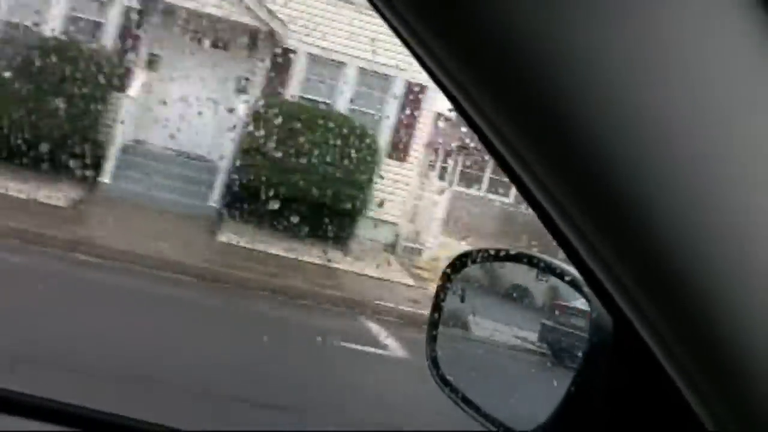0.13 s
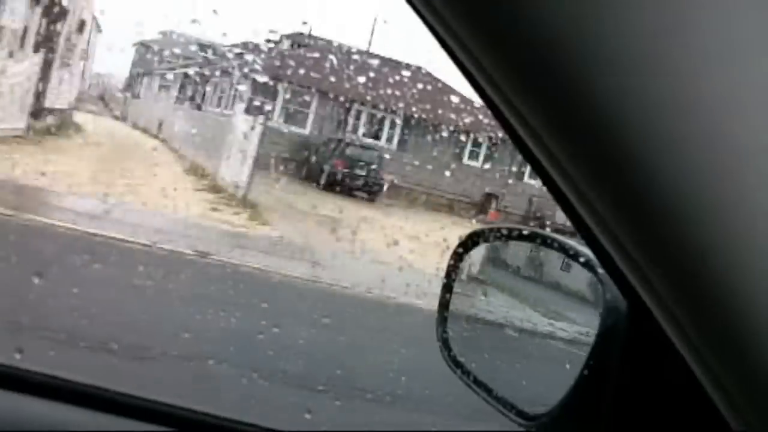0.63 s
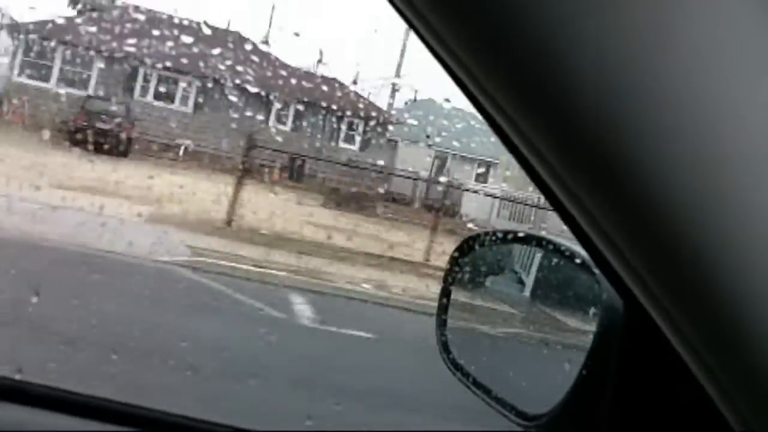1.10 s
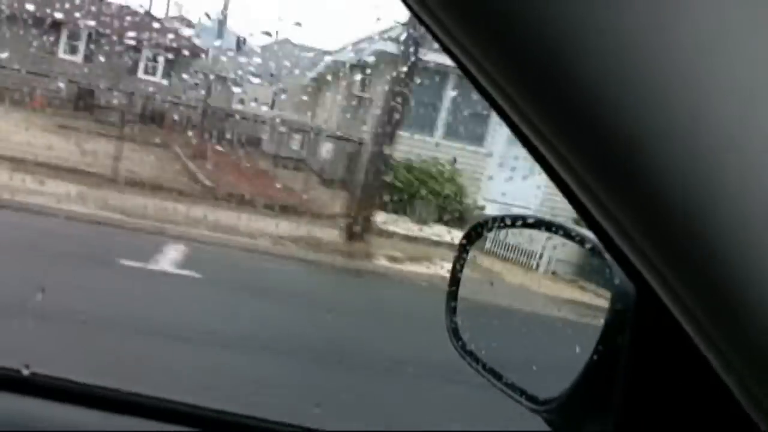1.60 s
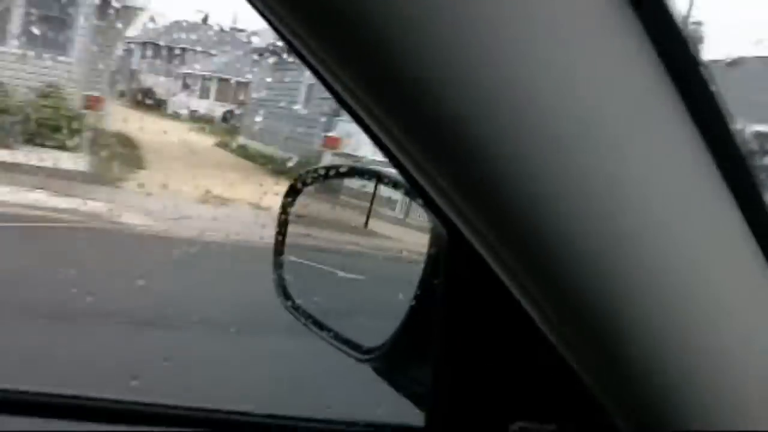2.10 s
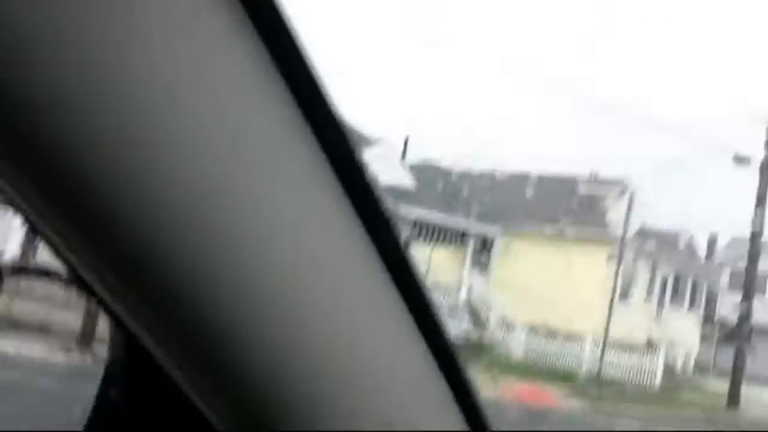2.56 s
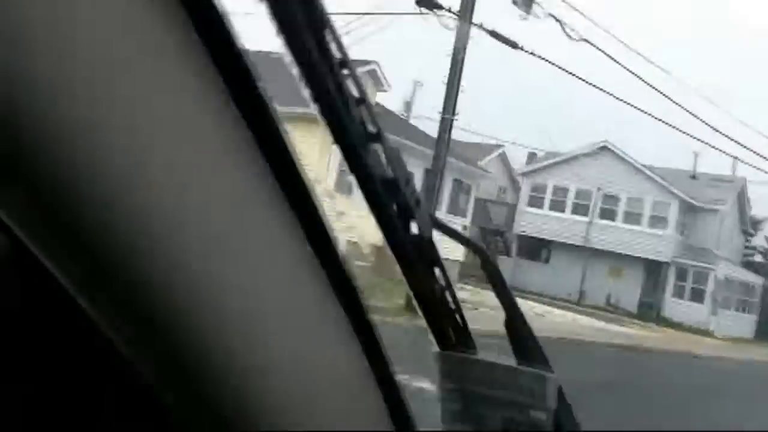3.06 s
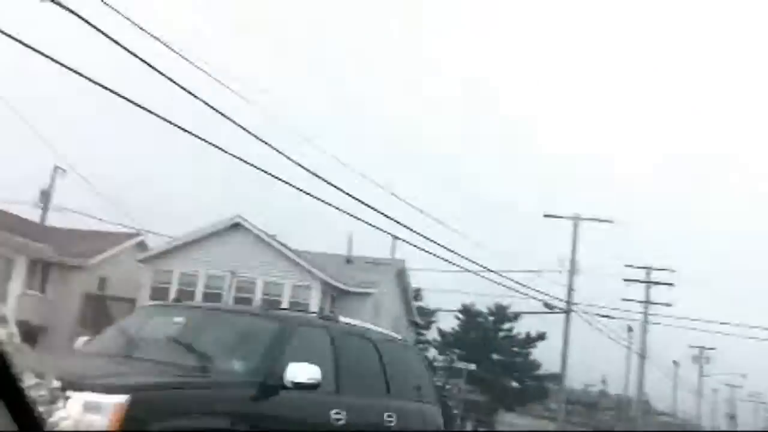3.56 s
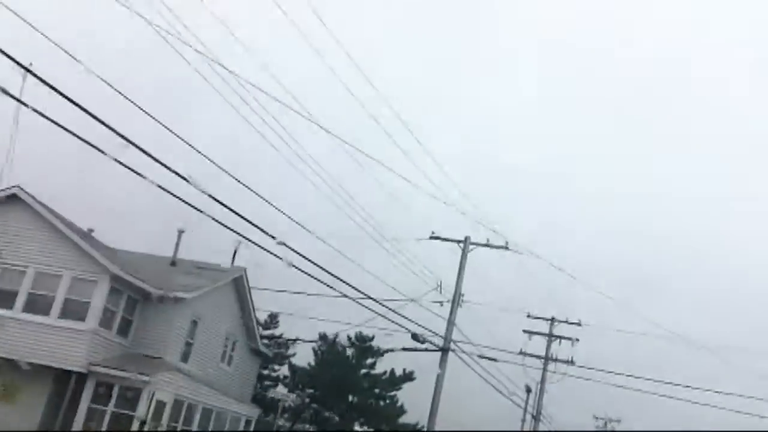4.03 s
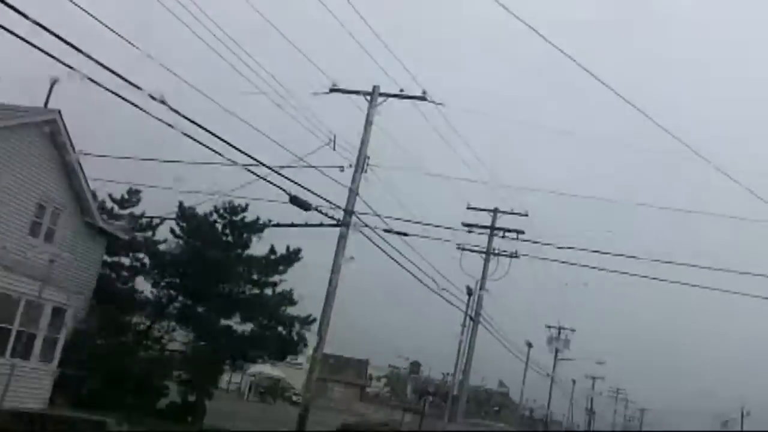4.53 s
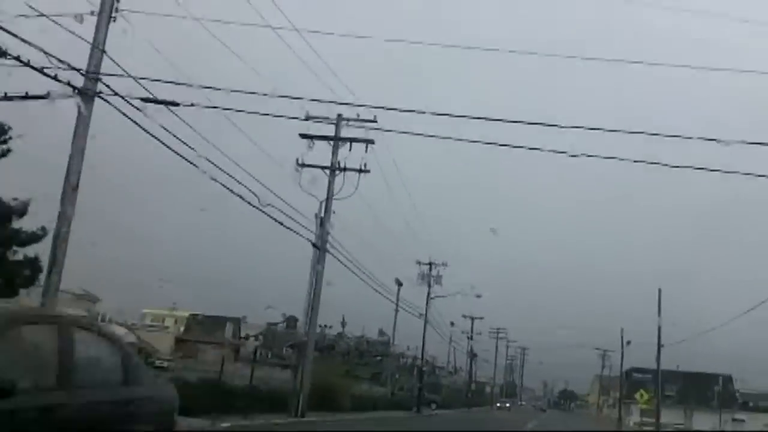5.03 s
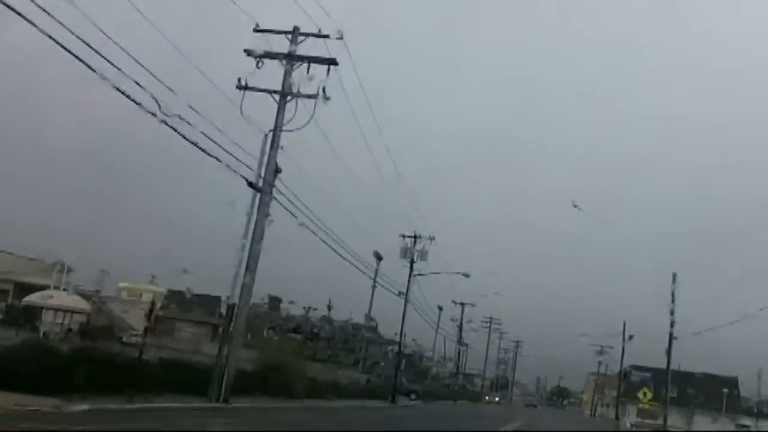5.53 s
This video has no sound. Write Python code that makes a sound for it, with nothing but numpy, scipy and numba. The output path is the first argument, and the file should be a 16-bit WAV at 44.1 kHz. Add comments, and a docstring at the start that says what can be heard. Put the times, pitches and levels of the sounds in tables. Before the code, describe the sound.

Heard inside a car driving through rain: a dark, uneven drone of tyres and engine dominates, while bumps boom very low. Quiet rain patters and hisses on roof and glass. The wiper judders and thuds near 2.7, 3.3 and 4 seconds. Hard jolts strike around 1, 3.4 to 3.9 and 4.8 seconds, making the microphone level duck.

```python
"""Inside a car on a wet street in rain, heard by one microphone in the cabin. Bumps set body and cabin air
booming, mostly below 45 Hz, as decaying low tones over a coloured-noise drone of tyres and engine.
Rain patters and hisses on roof and glass as noise bursts, and oncoming cars throw spray that swells it.
The wiper judders, thuds and swishes among bright noise bursts. A small recorder's stepped gain control
ducks and buzzes on the loudest booms."""
import sys
import numpy as np
from scipy import signal
from scipy.fft import rfft, irfft, next_fast_len
from scipy.io import wavfile
from scipy.ndimage import uniform_filter1d
from numba import njit

SR = 44100
rng = np.random.default_rng(int(sys.argv[2]) if len(sys.argv) > 2 else 0)


def gain_from_decibels(decibels):
    """Convert decibel values to linear amplitude factors."""
    exponent = np.asarray(decibels, float) / 20
    return 10 ** exponent


def waveform_to_disk(signal):
    """Save audio, clipped to [-1, 1], as 16-bit WAV at the path in sys.argv[1]."""
    frames = np.transpose(np.atleast_2d(signal))
    scaled = np.clip(frames, -1, 1) * 32767
    samples = np.round(scaled).astype(np.int16)
    wavfile.write(sys.argv[1], SR, samples)


N = 248724  # length of the scene [samples]


def booms():
    """Placed bumps boom low and may overlap; small random bumps keep the body modes stirring."""
    # placed bumps, strong and weak, whose low booms may overlap:
    # (time [s], level [dB], boom [Hz], swell time [s])
    bumps = [(0.545, -13, 22.5, .035), (0.677, -18.5, 38.8, .1), (0.942, -16, 40.5, .08),
             (.966, -7, 30, .009), (2.006, -15.5, 24.5, .06), (2.358, -10.5, 17.5, .065),
             (2.989, -8.5, 17.3, .06), (3.12, -25, 92, .07), (3.139, -16, 27.9, .1), (3.16, -19, 47, .03),
             (3.293, -7, 30.5, .03), (3.352, 1, 19, .04), (3.408, -6, 36, .014), (3.447, 4, 16.2, .045),
             (3.683, 3.5, 17.6, .042), (3.834, -7, 17, .009), (3.938, -9, 30, .018),
             (4.015, -11, 24.8, .045), (4.666, -16, 22.9, .11), (4.769, -5, 20, .008)]
    # sudden jolts that ring down:
    # (time [s], level [dB], boom [Hz], fading time [s], pressure first up 1 or down -1)
    sharp_jolts = [(1.007, 10, 18, .045, 1), (3.859, 12, 16.2, .048, -1), (4.8, 12.5, 18.2, .07, -1)]
    # body modes rung by the small bumps: (frequency [Hz], rms before roughness [dB], swell time [s])
    body_modes = [(17.34, -27, 0.098), (24.14, -30.5, .08), (37.76, -30.5, .09)]
    # roughness of the road under the small bumps: (time [s], level [dB])
    roughness = [(0, 8.5), (.8, 4.5), (1.4, -2), (3, 0.5), (3.4, -7), (3.9, -4.5), (4.3, 2), (4.85, -6),
                 (5.1, -3.5), (5.64, 2)]
    small_bumps_per_s = 11

    out = np.zeros(N)
    for s, db, hz, swell in bumps:
        add(out, s, gain_from_decibels(db) * boom(hz, swell))
    for s, db, hz, fade, way in sharp_jolts:
        add(out, s, way * gain_from_decibels(db) * jolt(hz, fade))
    for hz, db, swell in body_modes:
        # one second of road ahead of the scene, so that the modes already move at its start
        hit = rng.random(N + SR) < small_bumps_per_s / SR
        road = hit * rng.standard_normal(N + SR)
        stir = signal.oaconvolve(road, boom(hz, swell))[SR:SR + N]
        out += gain_from_decibels(db) * curve(roughness) * stir / stir.std()
    return out


def boom(hz, swell):
    """One low tone that swells, is strongest after the swell time, and dies."""
    t = np.arange(0, 8 * swell, 1 / SR)
    envelope = t / swell * np.exp(1 - t / swell)
    return envelope * np.sin(2 * np.pi * hz * t)


def jolt(hz, fade):
    """One low tone that rises fast and rings down."""
    rise = 0.022  # s
    t = np.arange(0, 6 * fade, 1 / SR)
    envelope = (1 - np.exp(-t / rise)) * np.exp(-t / fade)
    return envelope * np.sin(2 * np.pi * hz * t)


def drone():
    """Road roughness shakes the body; its modes colour the noise."""
    # restless body rumble, tyre and engine drone: (frequency [Hz], relative level [dB per Hz])
    drone_tone = [(8, -23), (18, -3.5), (28, -8.5), (37, 0), (50, -13.5), (68, -19.5), (100, -16),
                  (118, -17), (137, -14.5), (155, -20), (180, -26), (260, -32), (290, -33.5), (313, -27),
                  (345, -32.5), (450, -36), (690, -46.5), (750, -46), (785, -39.5), (830, -43.5),
                  (1090, -50.5), (1160, -49), (1215, -55), (1275, -50), (1400, -54.5), (2600, -74)]
    # tyre load on the road: (time [s], level [dB])
    tyre_load = [(0, 3), (.4, 0), (1, 2.5), (1.6, 0), (2.8, 2.5), (3.05, 2), (3.13, 4), (3.2, 3), (3.3, 6),
                 (3.37, 4), (3.45, 3.5), (3.65, 3.5), (3.9, -1.5), (4.2, 1), (5, 0), (5.64, 1)]
    drone_db = -24  # rms before the tyre load
    shake = rng.standard_normal(N) * flicker(1.4, 0.054)
    return gain_from_decibels(drone_db) * curve(tyre_load) * coloured(shake, drone_tone)


def rain():
    """Far drops melt into hiss, near ones patter, a few land hard."""
    # rain on the shell, heard from inside: (frequency [Hz], relative level [dB per Hz])
    rain_tone = [(400, -5), (800, -5.5), (1500, -6.5), (2500, -1.5), (4200, 2.5), (5300, 3), (6300, -5),
                 (7500, -17), (9300, -14.5), (12000, -24), (15000, -21.5)]
    # strength of the rain: (time [s], level [dB])
    strength = [(0, -3), (.3, -1), (.8, 4), (1.3, 1), (1.7, 0.5), (2.15, 1), (2.4, -0.5), (3.1, 1),
                (3.5, 3), (3.9, 1), (4.3, 0.5), (4.9, 0), (5.3, 1), (5.64, 2)]
    # largest drops: (time [s], level before the shell colours them [dB])
    large_drops = [(0.1292, -32), (0.265, -31), (0.388, -25.5), (0.961, -42.5), (1.092, -34), (1.148, -34),
                   (1.156, -35.5), (1.7626, -50.5), (1.8453, -33), (1.994, -27.5), (2.274, -32),
                   (2.375, -27.5), (2.582, -30.5), (2.615, -28.5), (2.711, -40), (2.776, -32.5),
                   (3.2916, -31), (3.5965, -26), (3.6205, -28), (3.765, -28), (4.006, -34), (4.042, -33),
                   (4.208, -35), (4.393, -42), (4.436, -28), (4.847, -26), (5.0502, -29.5), (5.247, -30.5),
                   (5.5, -28)]
    hiss_db, patter_db = -50.5, -51  # before strength and spray
    drops_per_s = 500

    hiss = rng.standard_normal(N) * flicker(1.7, 0.023) * flicker(1.32, 0.013)
    landed = rng.random(N) < drops_per_s / SR
    hits = landed * gain_from_decibels(6.7 * np.minimum(rng.exponential(1, N), 3.2))
    # each drop takes one of 16 different splats
    kind = rng.integers(0, 16, N)
    patter = sum(signal.oaconvolve(hits * (kind == k), splat(0.0013))[:N] for k in range(16))
    patter *= gain_from_decibels(patter_db) / patter.std()
    shower = curve(strength) * spray() * (gain_from_decibels(hiss_db) * hiss + patter)
    for s, db in large_drops:
        add(shower, s, gain_from_decibels(db) * splat(0.0022))
    return shower.std() * coloured(shower, rain_tone)  # the colouring keeps the overall rms


def splat(length):
    """A drop: a burst of noise that dies within milliseconds."""
    t = np.arange(0, 5 * length, 1 / SR)
    return rng.standard_normal(len(t)) * np.exp(-t / length) * (1 - np.exp(-t / 0.00037))


def spray():
    """Oncoming cars throw spray: a bell of gain on hiss and patter around each pass."""
    # passing cars: (time [s], extra level [dB], half length [s])
    passes = [(3.592, 2, 0.17), (4.853, 3.5, 0.55)]
    t = np.arange(N) / SR
    return gain_from_decibels(sum(db * np.exp(-((t - s) / half) ** 2) for s, db, half in passes))


def bright_bursts():
    """Bright flickering noise: blade swishes, and at 3.31 s a burst like the recorder's gain buzz."""
    # tone of the bursts: (frequency [Hz], relative level [dB per Hz])
    burst_tone = [(1500, -2), (6000, 4), (9500, -1.5), (13000, -4.5), (15500, -9)]
    noise = rng.standard_normal(N) * flicker(2.3, 0.0036)
    return burst_levels() * coloured(noise, burst_tone)


def burst_levels():
    """Level of the bright bursts: quick edges, and a steady slide in dB along each."""
    # blade swishes, and at 3.31 s a burst like the recorder's gain buzz:
    # (start [s], length [s], first level [dB], last level [dB])
    bursts = [(2.787, 0.23, -51.5, -51), (3.31, 0.078, -34.5, -54), (3.601, 0.098, -42, -41)]
    rise, fall = 0.013, 0.014  # s
    out = np.zeros(N)
    for s, length, first_db, last_db in bursts:
        t = np.arange(0, length, 1 / SR)
        edge = np.clip(np.minimum(t / rise, (length - t) / fall), 0, 1)
        add(out, s, edge * gain_from_decibels(first_db + (last_db - first_db) * t / length))
    return out


def wiper_knocks():
    """At each turn of the wiper the linkage judders and the panel below thuds."""
    # knocks at the ends of its travel:
    # (judder start [s], judder level [dB], judder length [s], thud level over the panel modes [dB])
    knocks = [(2.713, -30.5, 0.066, -7.5), (3.252, -49, 0.057, -11.5), (3.997, -51, 0.0327, -23.5)]
    # what the judder rings with: (frequency [Hz], width [Hz], level before the width is added [dB])
    linkage_modes = [(290, 160, 6.5), (505, 250, 10), (950, 130, 5), (1255, 290, 15.5), (1540, 370, 6),
                     (2100, 1600, 21.5), (3820, 1100, 5)]
    # panel under the windscreen that thuds at each knock: (frequency [Hz], width [Hz], level [dB])
    panel_modes = [(235, 39, -7), (313.7, 30, -4.5), (470, 250, 8.5)]

    out = np.zeros(N)
    # wide modes die sooner, so they start louder
    struck = [(hz, width, db + 10 * np.log10(width)) for hz, width, db in linkage_modes]
    linkage = ring(struck, 0.00015)
    linkage /= np.linalg.norm(linkage)
    for s, judder_db, length, thud_db in knocks:
        size = round(length * SR)
        rough = rng.standard_normal(6000) * flicker(2.5, 0.003)[:6000]
        swell = np.sin(np.pi * np.linspace(0, 1, size) ** 0.8) ** 2  # strongest before the middle
        judder = rough[:size] * swell
        add(out, s, gain_from_decibels(judder_db) * signal.fftconvolve(judder, linkage))
        add(out, s + 0.31 * length, gain_from_decibels(thud_db) * ring(panel_modes, 0.0083))
    return out


def ring(modes, rise):
    """The dying tones of a struck part: the wider a mode, the faster it dies."""
    t = np.arange(3000) / SR
    tones = sum(gain_from_decibels(db) * np.exp(-np.pi * width * t) * np.sin(2 * np.pi * hz * t)
                for hz, width, db in modes)
    return np.minimum(t / rise, 1) * tones


def read(points, hz):
    """A spectrum table on a log-frequency axis."""
    f, value = np.transpose(points)
    return np.interp(np.log(hz + 1), np.log(f + 1), value)


def curve(points):
    """A time table as gain, sample by sample."""
    s, db = np.transpose(points)
    return gain_from_decibels(np.interp(np.arange(N) / SR, s, db))


def coloured(x, points):
    """Causal (minimum-phase) colouring by a spectrum table, then rms 1."""
    hz = abs(np.fft.fftfreq(2 ** 16, 1 / SR))
    far_below = hz < points[0][0] / 2  # an octave under the table: nearly silent
    log_gain = np.log(gain_from_decibels(read(points, hz) - 90 * far_below))
    taps = np.fft.ifft(np.exp(np.conj(signal.hilbert(log_gain)))).real[:2 ** 15]
    y = signal.oaconvolve(x, taps)[:N]
    return y / y.std()


def flicker(db, seconds):
    """A random gain that wanders by db (rms) over the given time."""
    wander = uniform_filter1d(rng.standard_normal(N), max(round(seconds * SR), 1))
    return gain_from_decibels(db * wander / wander.std())


def add(mix, s, sound):
    """Mixes a sound in at a time, cut at the end of the mix."""
    part = mix[round(s * SR):][:len(sound)]
    part += sound[:len(part)]


def scene():
    """Everything reaches one microphone in the cabin."""
    return (booms() + drone() + rain() + bright_bursts() + wiper_knocks())[None]


@njit
def gain_steps(level, ceiling, fall_every, rise_every, hold):
    """Counts steps down while over the ceiling, waits, then slowly counts back up."""
    steps, count, wait, quiet = np.zeros(len(level)), 0, 0.0, 0.0
    for n in range(len(level)):
        wait += 1
        quiet = quiet + 1 if level[n] - count < ceiling else 0.0
        if quiet == 0 and wait >= fall_every:
            count, wait = count + 1, 0.0
        elif quiet > hold and count > 0 and wait >= rise_every:
            count, wait = count - 1, 0.0
        steps[n] = count
    return steps


def gain_control(x):
    """Loud peaks push the gain down in audible steps; it climbs back after a quiet wait."""
    step_db, ceiling_db = 0.7, -8.8
    clock = 18.4  # samples: about one step down a tick (a buzz near 2.4 kHz), one up every eight
    hold = 0.016 * SR  # samples under the ceiling before it climbs
    level = 20 * np.log10(abs(x) + 1e-9) / step_db  # in steps
    steps = gain_steps(level, ceiling_db / step_db, clock - 0.4, 8 * clock, hold)
    return x * gain_from_decibels(-step_db * steps)


def tone_filter(x):
    """Fixed notches after the gain control; subsonics and treble are rolled off."""
    # notches: (frequency [Hz], width [Hz])
    notches = [(2720, 630), (5510, 746), (8000, 850), (10920, 400)]
    size = next_fast_len(N)
    hz = np.fft.rfftfreq(size, 1 / SR)
    gain = np.prod([np.hypot(hz - f, 25) / np.hypot(hz - f, width) for f, width in notches], axis=0)
    low_cut = 1j * hz / (1j * hz + 13)
    gentle_cut = 1 / (1 + 1j * hz / 5500)
    steep_cut = 1 / np.sqrt(1 + (hz / 14500) ** 24)
    return irfft(rfft(x, size) * gain * low_cut * gentle_cut * steep_cut, size)[:N]


def low_pass(x):
    """Removes everything above the highest recorded frequency."""
    return signal.sosfilt(signal.butter(12, 15640, fs=SR, output="sos"), x)


def record(dry):
    """Stepped gain control, then a fixed tone filter."""
    levelled = gain_control(dry[0])
    mix = tone_filter(levelled)[None]
    return low_pass(mix)


dry = scene()
out = record(dry)
waveform_to_disk(out)
```